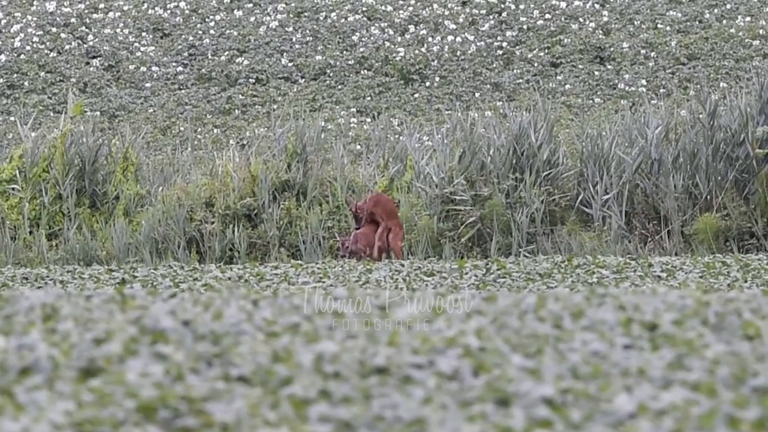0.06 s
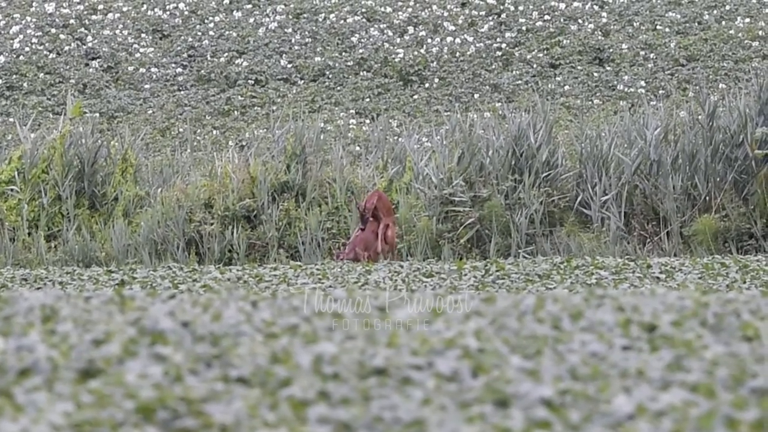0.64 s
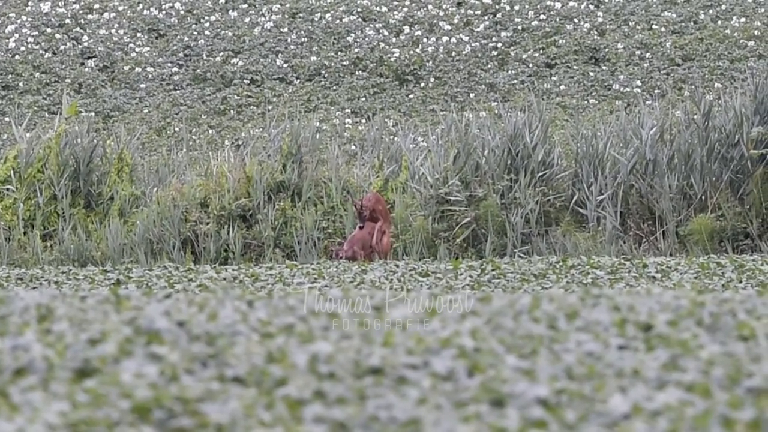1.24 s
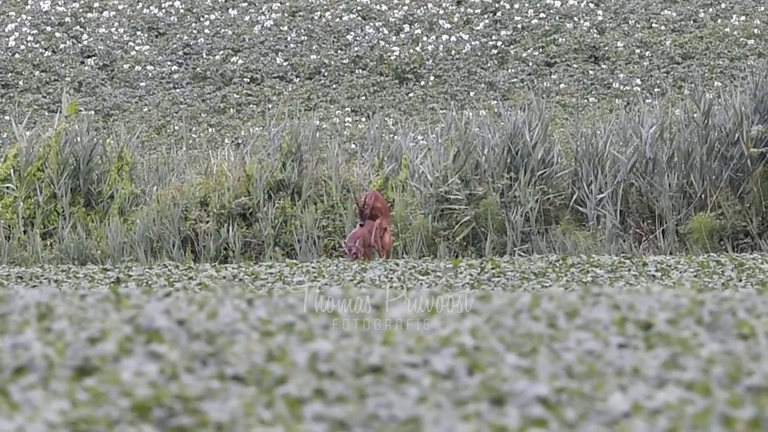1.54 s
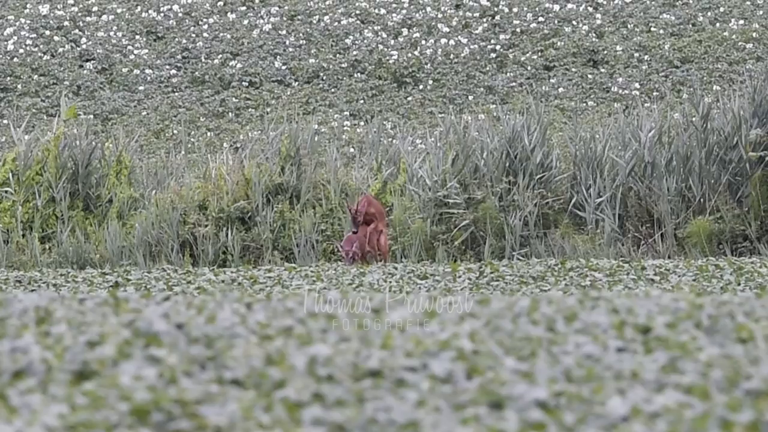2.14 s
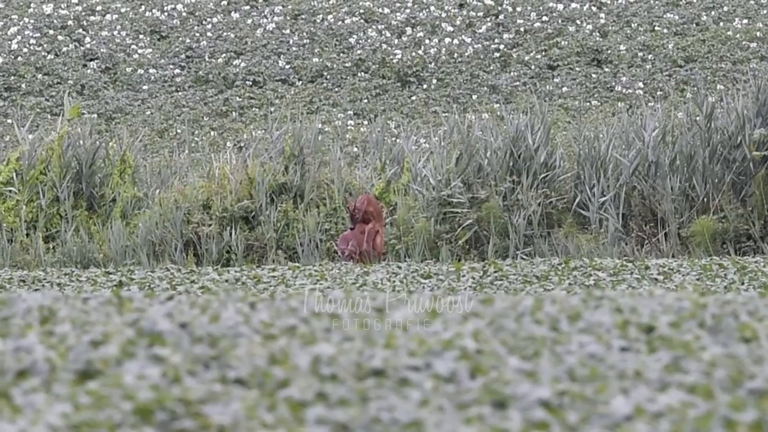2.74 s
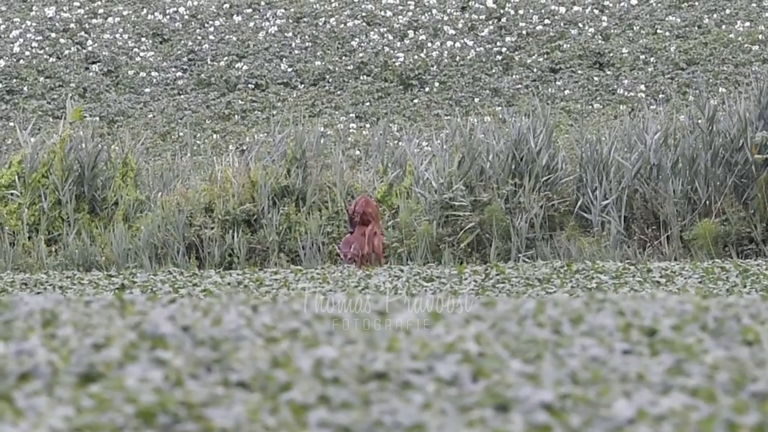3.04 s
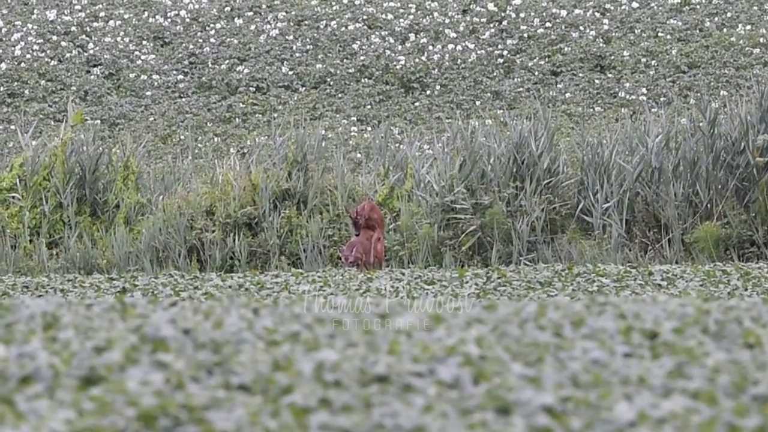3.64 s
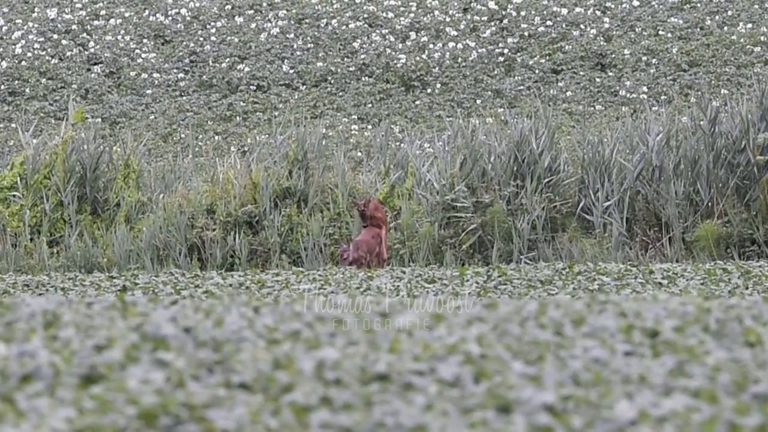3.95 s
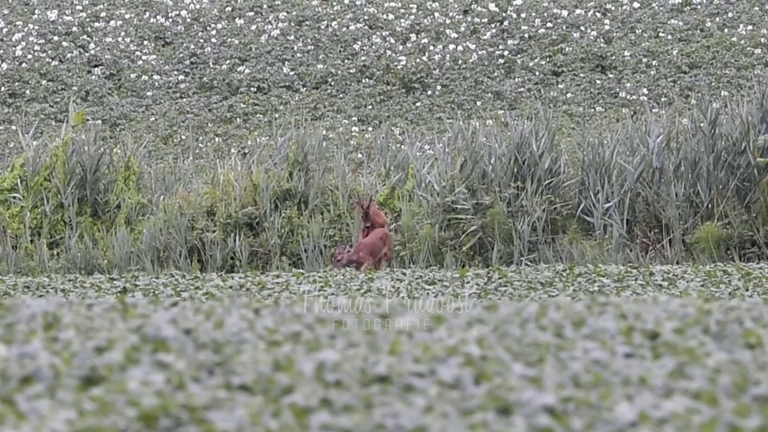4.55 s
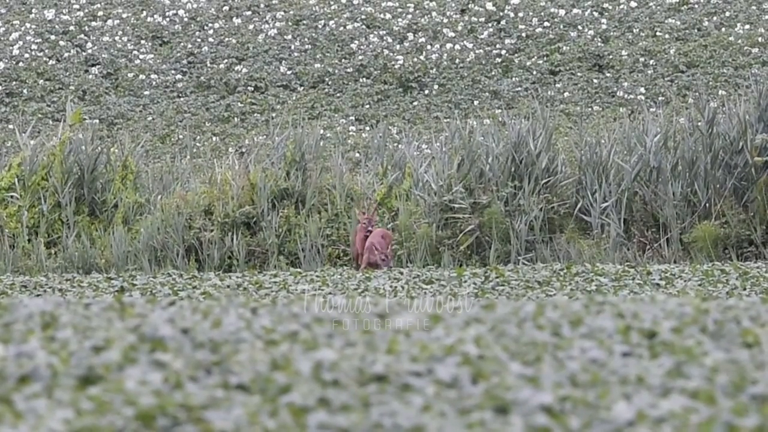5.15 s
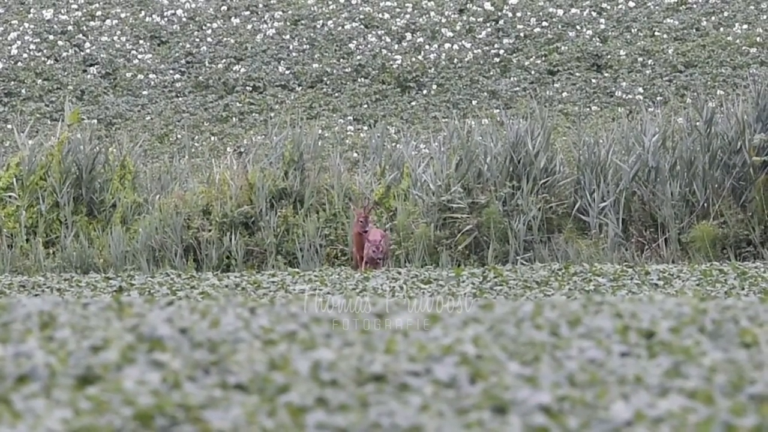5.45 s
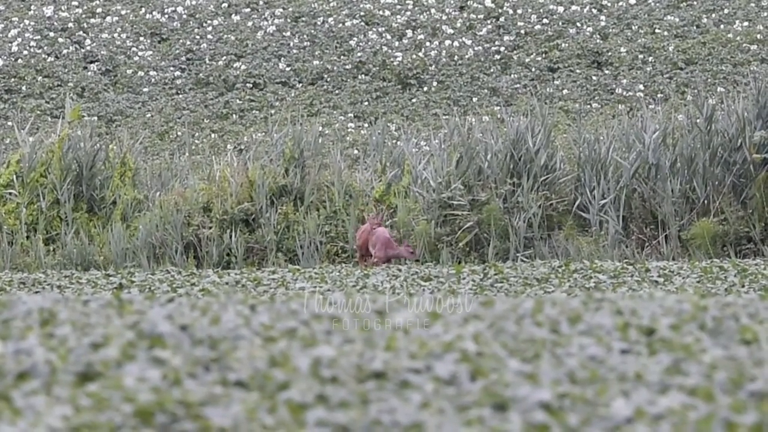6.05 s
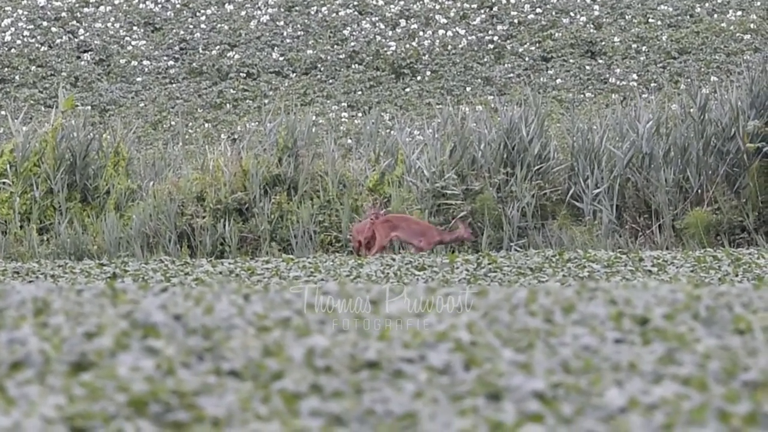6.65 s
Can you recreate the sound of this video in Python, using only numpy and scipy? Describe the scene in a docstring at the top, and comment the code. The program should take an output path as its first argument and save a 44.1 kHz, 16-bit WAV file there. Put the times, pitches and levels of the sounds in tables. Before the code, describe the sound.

A low, steady hum of far-off traffic over open countryside, with faint bird whistles and a brief trilling song.

```python
"""Field edge, distant traffic

Far traffic drones across a quiet field in a few broad resonances; one engine pulls away in bursts of
throttle while another holds its speed. Off to the right, small birds whistle and a finch-like song
scatters through reeds and trees, and dry stalks tick. The camera's two microphones add their own
hiss, its electronics a faint buzz and whine."""
import sys
import numpy as np
from scipy import signal
from scipy.fft import rfft, irfft
from scipy.io import wavfile

SR = 44100
rng = np.random.default_rng(int(sys.argv[2]) if len(sys.argv) > 2 else 0)


def dump(signal):
    """Clip the signal to [-1, 1] and save it as 16-bit WAV at the path in sys.argv[1]."""
    limited = np.clip(np.atleast_2d(signal).T, -1, 1)
    pcm = np.round(limited * 32767).astype(np.int16)
    wavfile.write(sys.argv[1], SR, pcm)


N = 303849
TIME = np.arange(N) / SR
FREQ = np.maximum(np.arange(N // 2 + 1) * SR / N, 1)

# microphone hiss: freq_hz, left_db_per_hz, right_db_per_hz
MIC_HISS = [(80, -128, -128), (298, -104, -104), (900, -105, -104), (1930, -107.3, -106),
            (2880, -109, -105.8), (4750, -111, -107.6), (8250, -114.5, -108), (10600, -117, -108),
            (11850, -117, -112), (13600, -117, -115.5), (14200, -117, -116), (15600, -121, -121)]
# electrical bursts in each camera frame: offset_ms, length_ms, pitch_hz, left_rms_db, right_rms_db
FRAME_BURSTS = [(6.5, 2, 6400, -99.5, -82.5), (3.3, .07, 15000, -97, -87), (4.8, 0.12, 9800, -92, -86.5),
                (9, 0.33, 6000, -98, -85), (3.4, 1.2, 16000, -89, -99)]
# dry stalks snapping: start_s, centre_hz, width_hz, level_db (ahead of the envelope), decay_s
STALK_SNAPS = [(.245, 11000, 2980, -64, .005), (2.393, 11000, 2500, -63, .004),
               (3.1026, 6350, 1000, -44.5, 0.0015), (3.103, 2900, 1400, -56, 0.0029),
               (3.7126, 5940, 1200, -43.5, 0.0016), (3.713, 10200, 2000, -52.5, 0.0023),
               (3.7367, 9900, 1700, -49.5, 0.0022), (4.631, 10800, 2000, -62, .005),
               (5.954, 11800, 2500, -61.5, .004)]
# small birds: start_s, length_s, first_hz, middle_hz, last_hz, level_db, fade_db, scattered_share (0-1)
BIRD_CALLS = [(0, 0.024, 4200, 3780, 3600, -57.5, 2, 0.8), (0.109, 0.046, 2965, 3054, 3040, -57, 0, 0.34),
              (.15, 0.15, 3060, 3160, 3120, -71, 2, 0), (0.279, 0.04, 3654, 3355, 2730, -52.5, -0.5, 0.46),
              (.312, 0.31, 2824, 2855, 2830, -56, 37, .3), (2.8, 0.064, 1810, 1890, 1880, -70, 0, .5),
              (5.042, .05, 4200, 4440, 4580, -76, 0, .15), (5.075, .17, 4520, 4710, 4750, -76, 4, .15),
              (5.285, 0.18, 4700, 4550, 4460, -78, 0, 0.2), (5.47, .05, 4340, 4300, 4280, -78, 0, .2)]
# the finch's opening pip and the falling sweep of its trill: length_s, first_hz, middle_hz, last_hz
FINCH_PIP = (.022, 4400, 4270, 3900)
FINCH_SWEEP = (.036, 4480, 3750, 2600)
# closing notes of the song, the last two from a second bird: start_s, length_s, first_hz, middle_hz, last_hz,
# level_db (ahead of the reeds)
FINCH_FLOURISH = [(2.862, 0.078, 4500, 3350, 2700, -72.5), (3.03, 0.075, 4450, 3300, 2550, -72),
                  (3.188, 0.065, 2730, 3170, 3180, -72), (3.27, .025, 2970, 2650, 2400, -71),
                  (3.302, .048, 2750, 3110, 3250, -71.5), (3.562, 0.091, 3200, 2950, 3070, -76),
                  (3.64, .08, 3400, 3750, 3850, -81)]
# broad spectrum of the far traffic: freq_hz, level_db_per_hz
ROAR_SPECTRUM = [(20, -103), (48, -86), (110, -82.5), (185, -87), (260, -80), (345, -72), (440, -72),
                 (500, -82.5), (620, -85.5), (760, -90), (1230, -93), (1360, -97), (1850, -96.5),
                 (2500, -108)]
# resonances that stand out of it: centre_hz, width_hz, lift_db
ROAR_RESONANCES = [(123, 13, -1.5), (157, 6.6, 0.5), (251.6, 12.3, 8), (314.7, 15, 3), (342.6, 45, 4.5),
                   (367.4, 14, 2.5), (421, 22.4, 4.5), (470, 20, 3), (501, 14, -4.5), (516, 35, 6.5),
                   (570, 45, 8), (653, 26, 5.5)]
# held pitches within it: pitch_hz, rms_db, waver_share (of the pitch), trend_db_per_s
DRONE_TONES = [(346, -54.5, 0.00449, -0.34), (570.6, -63, 0.00696, -0.5)]
# brief surges of its low mids: centre_s, length_s, pitch_hz, level_db
ROAR_SURGES = [(1.175, 0.027, 355, -45.5), (2.434, 0.045, 346.3, -46.5), (3.795, 0.03, 359, -44),
               (5.066, 0.029, 355, -46), (5.328, 0.023, 345.3, -43), (5.935, 0.041, 347, -45.5),
               (6.134, 0.065, 360.2, -47.5), (6.69, 0.017, 415.8, -40.5)]
# its slow swelling and sinking: time_s, low_mid_gain_db, upper_mid_gain_db
ROAR_SWELL = [(0, 1.5, -1), (.55, 2, -4), (.8, -0.5, -.5), (1.25, 1.1, -0.5), (2.1, -2.5, 1),
              (3.7, -0.8, 0), (4.2, -2.5, -1.5), (5.1, 1.3, -.5), (5.6, -1.5, -1), (5.9, -1.5, 0),
              (6.1, -1, 2.5), (6.35, 0, -1.5), (6.89, -1.8, 1)]
# the roar at the left microphone against the right, above the deep bass: freq_hz, gain_db
LEFT_MIC_SHADE = [(200, 0.5), (350, -3), (570, -6.5), (800, -9), (1200, -18.5), (2500, -22)]
# one engine idles, speeds up and cruises: time_s, firing_hz
FIRING_RATE = [(0, 44.7), (2.1, 43.5), (2.38, 52.45), (2.85, 64.1), (3.2, 68.5), (3.55, 67.9), (4.05, 79.9),
               (4.3, 79.5), (5.25, 70.3), (5.6, 78.4), (6.89, 75)]
# its bursts of throttle: start_s, end_s, level_db
THROTTLE_BURSTS = [(2.25, 2.7, -63), (2.77, 3.2, -63), (3.225, 3.667, -59), (3.86, 4.415, -61),
                   (4.633, 5.22, -61), (5.347, 5.72, -66.5), (6.35, 6.891, -65)]


def undb(db):
    """Decibels to gain."""
    return 10 ** (np.asarray(db) / 20)


def unit(x):
    """Scale to rms 1."""
    return x / np.sqrt(np.mean(x ** 2))


def bell(x, centre, width):
    """A bump of height 1, half as high at half the width from its centre."""
    return .5 ** ((2 * (x - centre) / width) ** 2)


def slope(hz, db):
    """Join spectrum points on a log-frequency axis."""
    return np.interp(np.log(FREQ), np.log(hz), db)


def filtered(x, gain):
    """Weight each frequency of a sound."""
    return irfft(rfft(x) * gain, N)


def noise(db_per_hz):
    """Noise with the given spectrum."""
    return filtered(rng.standard_normal(N), undb(db_per_hz)) * np.sqrt(SR / 2)


def band(hz, width_hz):
    """Noise of rms 1 in one band."""
    return unit(filtered(rng.standard_normal(N), np.sqrt(bell(FREQ, hz, width_hz))))


def wander(rate_hz):
    """Slow random drift of rms 1."""
    return band(0, 2 * rate_hz)


def tone(hz):
    """A sine that follows a moving pitch."""
    return np.sin(2 * np.pi * np.cumsum(hz) / SR)


def camera_noise(frame_hz=59.94, whine_hz=15734, whine_left_db=-91, whine_right_db=-81):
    """Each microphone hisses alone; the electronics repeat their bursts every frame and whine thinly."""
    hz, *sides = np.transpose(MIC_HISS)
    hiss = np.array([noise(slope(hz, db)) for db in sides])
    buzz, in_frame_s = 0, TIME % (1 / frame_hz)
    for offset_ms, length_ms, pitch_hz, left_db, right_db in FRAME_BURSTS:
        age = in_frame_s - offset_ms / 1000
        burst = np.sqrt(bell(age, 0, length_ms / 1000)) * np.sin(2 * np.pi * pitch_hz * age)
        buzz += unit(burst) * undb([[left_db], [right_db]])
    whine = unit(np.sin(2 * np.pi * whine_hz * TIME)) * undb([[whine_left_db], [whine_right_db]])
    return hiss + buzz + whine


def stalks(left_db=-12, rise_s=0.00056):
    """Dry stalks to the right give tiny snaps that die within milliseconds."""
    snaps = 0
    for start_s, hz, width_hz, db, decay_s in STALK_SNAPS:
        age = np.maximum(TIME - start_s, 0)
        envelope = (1 - np.exp(-age / rise_s)) * np.exp(-age / decay_s)
        snaps += band(hz, width_hz) * undb(db) * envelope
    return snaps * undb([[left_db], [0]])


def whistle(start_s, length_s, first_hz, middle_hz, last_hz, db, fade_db=0):
    """A bird's pure note gliding through three pitches; it may fade as it is held."""
    note, inside = np.zeros(N), (TIME >= start_s) & (TIME < start_s + length_s)
    progress = (TIME[inside] - start_s) / length_s
    glide_hz = np.polyval(np.polyfit([0, .5, 1], [first_hz, middle_hz, last_hz], 2), progress)
    arch = np.sqrt(2 * np.abs(np.sin(np.pi * progress)))
    note[inside] = arch * undb(db - fade_db * progress) * tone(glide_hz)
    return note


def repeat(note, count, start_s, gap_s, db, quicken_s=0, growth_db=0):
    """One note sung over and over; each gap may be shorter and each note louder than the last."""
    starts = [start_s + k * gap_s - quicken_s * k * (k - 1) / 2 for k in range(count)]
    return sum(whistle(start, *note, db + k * growth_db) for k, start in enumerate(starts))


def finch():
    """Pips that quicken and grow, an even trill of falling sweeps, then a flourish, with two quieter notes from
    a second bird."""
    pips = repeat(FINCH_PIP, count=8, start_s=1.445, gap_s=.13, db=-73, quicken_s=.0015, growth_db=.3)
    trill = repeat(FINCH_SWEEP, count=7, start_s=2.411, gap_s=.0605, db=-70.5)
    return pips + trill + sum(whistle(*note) for note in FINCH_FLOURISH)


def scatter(x, t60_s):
    """Dense fading echoes off leaves, different at each microphone."""
    echoes = rng.standard_normal((2, SR)) * np.exp(-np.log(1000) * TIME[:SR] / t60_s)
    echoes /= np.sqrt(np.sum(echoes ** 2, axis=1, keepdims=True))
    return signal.fftconvolve(x[None], echoes, axes=1)[:, :N]


def birds(ragged_db=2.6, song_direct_db=-6.5, song_echo_db=-2, call_blur_db=-11, left_db=-19):
    """Birds to the right, blurred by reeds, with a tail from the trees; the farther song is ragged."""
    song = finch() * undb(ragged_db * wander(40))
    direct_calls, scattered_calls = 0, 0
    for *note, scattered_share in BIRD_CALLS:
        call = whistle(*note)
        direct_calls += np.sqrt(1 - scattered_share) * call
        scattered_calls += np.sqrt(scattered_share) * call
    scattered_song = undb(song_echo_db) * song
    reeds = scatter(scattered_song + undb(call_blur_db) * direct_calls, t60_s=.05)
    trees = scatter(scattered_calls, t60_s=.75) + scatter(scattered_song, t60_s=2.4)
    return (direct_calls + undb(song_direct_db) * song + reeds + trees) * undb([[left_db], [0]])


def drone(flutter_db=3.5):
    """Held pitches sing through the roar, wavering and fading on their way across the field."""
    tones = 0
    for hz, db, waver_share, trend_db_per_s in DRONE_TONES:
        wavering = tone(hz * (1 + waver_share * wander(3)))
        fading = undb(flutter_db * wander(4.8) + trend_db_per_s * TIME)
        tones += unit(wavering * fading) * undb(db)
    return tones


def surges(waver_share=0.0399):
    """Short soft whoomps in the low mids, each with a wavering pitch."""
    whoomps, wavering_time = 0, np.cumsum(1 + waver_share * wander(20.7)) / SR
    for centre_s, length_s, hz, db in ROAR_SURGES:
        envelope = np.sqrt(2 * bell(TIME, centre_s, length_s))
        whoomps += envelope * np.sin(2 * np.pi * hz * wavering_time) * undb(db)
    return whoomps


def traffic(air_db_per_octave=14, flutter_db=0.5, bass_hz=110, lead_rad_at_1khz=0.83):
    """A resonant far roar; the right microphone hears it louder, brighter and a shade later."""
    hz, db = np.transpose(ROAR_SPECTRUM)
    resonance_db = sum(lift * bell(FREQ, centre, width) for centre, width, lift in ROAR_RESONANCES)
    air_loss_db = air_db_per_octave * np.maximum(np.log2(FREQ / hz[-1]), 0)  # air soaks up the treble
    roar = noise(slope(hz, db) + resonance_db - air_loss_db) + drone() + surges()
    times, *swells = np.transpose(ROAR_SWELL)
    low_db, upper_db = (np.interp(TIME, times, swell) for swell in swells)
    low_db += flutter_db * wander(3.5)
    low_mids, upper_mids = filtered(roar, bell(FREQ, 380, 200)), filtered(roar, bell(FREQ, 616, 450))
    right = roar + low_mids * (undb(low_db) - 1) + upper_mids * (undb(upper_db) - 1)
    shade = undb(slope(*np.transpose([(bass_hz, 0), *LEFT_MIC_SHADE])))
    phase_lead = np.exp(1j * lead_rad_at_1khz * (FREQ / 1000) ** 2)
    return np.array([filtered(right, shade * phase_lead), right])


def steady_engine(firing_hz=106.75, level_db=-67.5, flutter_db=3.5, waver_share=0.0086):
    """A far engine holds its speed; its firing note wavers and flutters."""
    hum = unit(tone(firing_hz * (1 + waver_share * wander(3.5))))
    return hum * undb(level_db + flutter_db * wander(13))


def departing_engine(idle_db=-86, rise_s=0.078, fall_s=0.04, flutter_db=0.5):
    """Only the firing note carries this far; it grows loud with each burst of throttle."""
    firing_hz = np.interp(TIME, *np.transpose(FIRING_RATE))
    gain = undb(idle_db)
    for start_s, end_s, db in THROTTLE_BURSTS:
        throttle = np.clip(np.minimum((TIME - start_s) / rise_s, 1 - (TIME - end_s) / fall_s), 0, 1)
        gain = np.maximum(gain, throttle * undb(db))
    return unit(tone(firing_hz)) * gain * undb(-flutter_db * wander(3.1))


def scene():
    """Everything the stereo pair hears from the edge of the field."""
    return traffic() + departing_engine() + steady_engine() + birds() + stalks() + camera_noise()


def record(dry):
    """The recorder cuts the top steeply above 15.8 kHz."""
    return signal.sosfilt(signal.ellip(10, .2, 70, 15800, fs=SR, output="sos"), dry)


dry = scene()
out = record(dry)
dump(out)
```